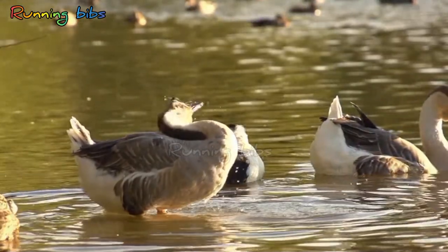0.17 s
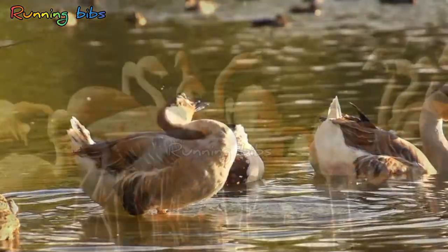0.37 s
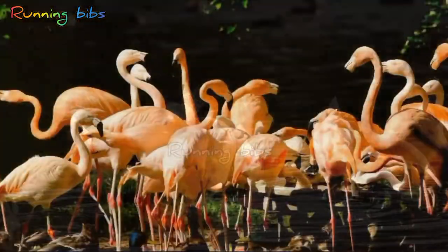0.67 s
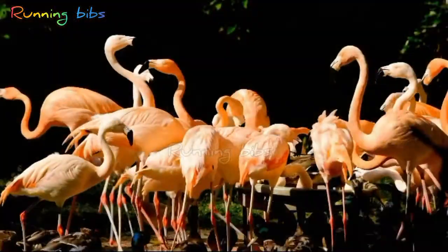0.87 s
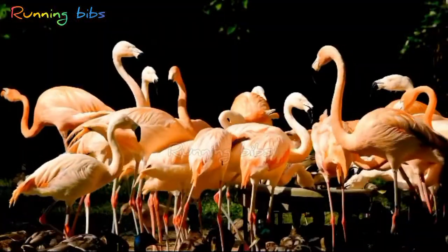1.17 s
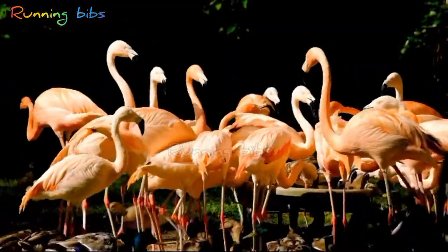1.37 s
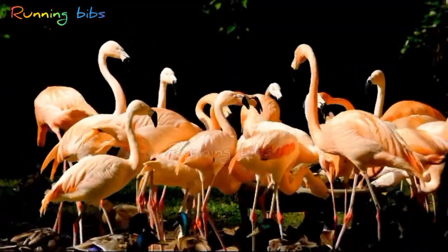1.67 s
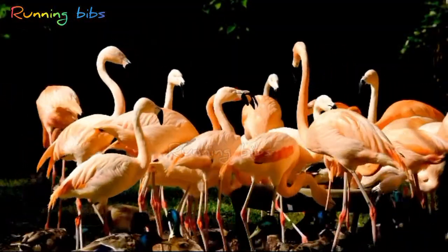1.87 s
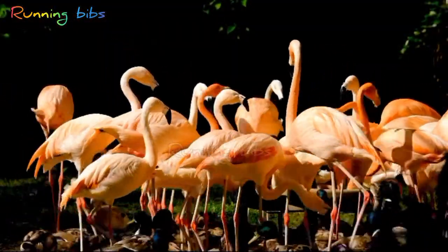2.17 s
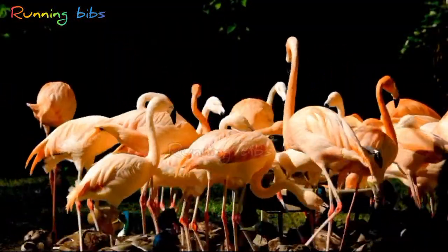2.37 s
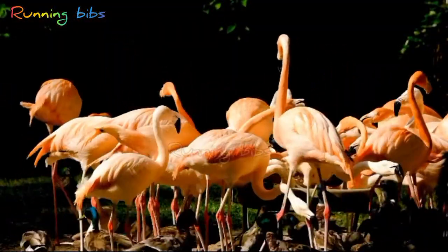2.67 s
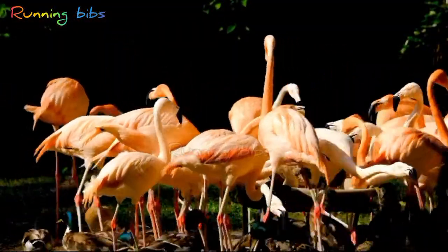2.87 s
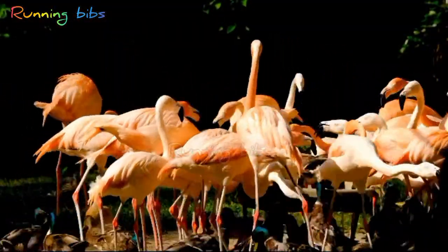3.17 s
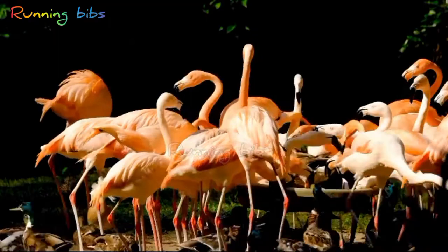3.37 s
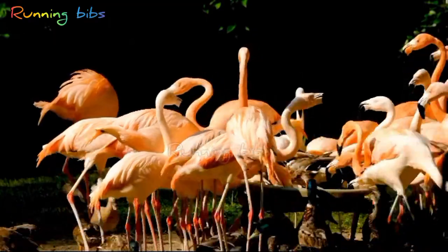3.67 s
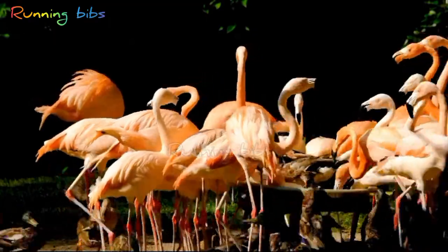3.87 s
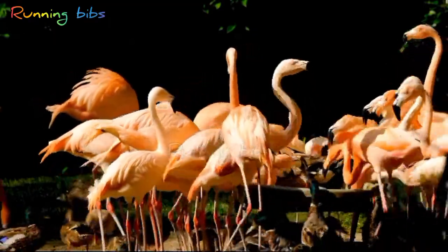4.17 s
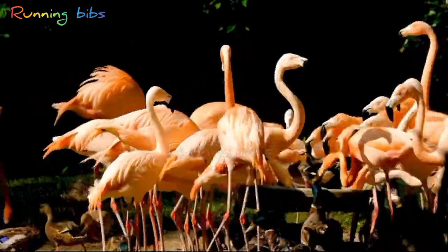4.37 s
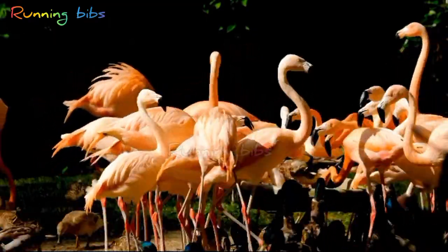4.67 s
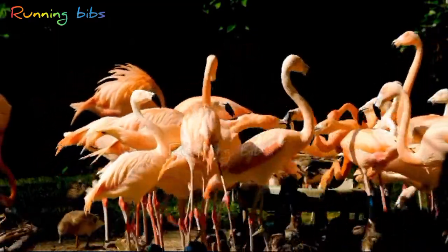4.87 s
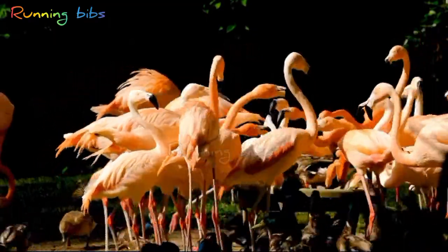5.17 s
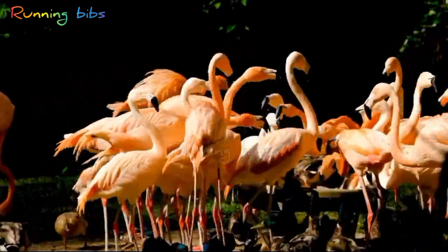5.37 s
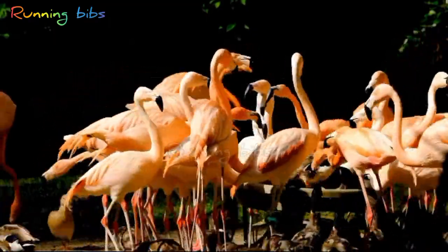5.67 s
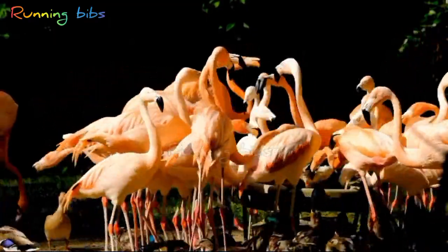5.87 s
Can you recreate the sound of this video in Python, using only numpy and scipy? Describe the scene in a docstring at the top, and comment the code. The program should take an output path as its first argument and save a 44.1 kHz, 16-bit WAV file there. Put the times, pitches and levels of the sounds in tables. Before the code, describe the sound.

For the first half second, geese splash in shallow water: dense small bubbles, spray and a few rounder plops, close and slightly left, fading quickly. At about 0.53 s an open-air bird park comes in, with airy hush, light low wind gusts, mostly before 2.2 s, and a deep pump hum. A dull knock falls at 0.65. Gull-like calls, a high yelp dropping into a lower reedy wail, sound at 1.0 and 2.5, with shorter cries at 2.2, 3.0 and 3.2, and the loudest pair at 4.75. Near sparrows cheep sharply at 1.5, 3.2, 4.4 and 5.9 and chirrup at 2.0, 2.4, 3.7 and 4.1, amid distant chatter and thin high peeps. On the right a hoarse duck quacks irregularly until 2.9, then from 3.5 about every 0.3 s, stronger after 4. A snap comes at 2.2, a sharper double knock at 4.6. Slight outdoor echo; everything continues to the end at 6 s.

```python
"""Pond and bird park

Splashing geese in a shallow pond, made of ringing bubbles and spray noise, fade out as a bird park opens.
A gull's wailing two-note calls are sums of harmonics; sparrows near and far chirp in swept tones.
On the right a duck quacks, pulses ringing its throat; a few knocks are damped bursts of noise.
Under them lie a humming pump of three sines and light wind of coloured noise."""
import sys
import numpy as np
from scipy import signal
from scipy.fft import rfft, irfft
from scipy.io import wavfile
from scipy.ndimage import uniform_filter1d, minimum_filter1d

SR = 44100
rng = np.random.default_rng(int(sys.argv[2]) if len(sys.argv) > 2 else 0)


def materialize(psi):
    """Save the field psi as 16-bit PCM at rate SR to the path in sys.argv[1].

    A 1-D psi becomes a single channel; in a 2-D psi each row is a channel.
    """
    bounded = np.clip(np.atleast_2d(psi).T, -1, 1)
    quanta = np.round(bounded * 32767).astype(np.int16)
    wavfile.write(sys.argv[1], SR, quanta)


N = 264600
TIME = np.arange(N) / SR

# sparrow syllable, up-and-down sweeps of the syrinx: top from the accent t/s, rise/s, fall/s,
# start f/Hz, top f/Hz, end f/Hz, relative level/dB; each call scales times and pitch
CHIRRUP_SWEEPS = [(0, .014, 0.0179, 3397, 4340, 3446, -0.37), (.019, .008, .012, 3539, 3900, 2800, -1),
                  (.043, .016, .022, 2903, 3547, 2858, 2)]


def amp(db):
    """Logarithmic level: decibels to amplitude ratio."""
    return 10 ** (np.asarray(db) / 20)


def unit(x):
    """Normalization by power: scales to rms 1."""
    return x / np.sqrt(np.mean(x ** 2) + 1e-20)


def read(points, hz):
    """Spectral envelope: interpolates levels on a log-frequency axis."""
    f, value = np.transpose(points)
    return np.interp(np.log(hz + 1), np.log(f + 1), value)


def add(mix, s, sound):
    """Superposition: adds a sound into a track from time s."""
    part = mix[max(round(s * SR), 0):][:len(sound)]
    part += sound[:len(part)]


def colour(x, points):
    """Linear filtering: weights the spectrum of x, then sets rms 1."""
    n = x.shape[-1]
    gain = amp(read(points, np.fft.rfftfreq(n, 1 / SR)))
    return unit(irfft(rfft(x) * gain, n))


def wander(count, rate):
    """Band-limited fluctuation: noise rolled off above a rate in Hz, normalized to rms 1."""
    hz = np.fft.rfftfreq(SR if count < SR else N, 1 / SR)
    noise = rng.standard_normal(2 * len(hz) - 2)
    return unit(irfft(rfft(noise) / (1 + (hz / rate) ** 4)))[:count]


def resonate(x, hz, width):
    """Damped resonance: one pole whose bandwidth sets its decay, with peak gain near 1."""
    r = np.exp(-np.pi * width / SR)
    pole = r * np.exp(2j * np.pi * hz / SR)
    return 2 * signal.lfilter([1 - r], [1, -pole], x).real


def low_pass(x, hz):
    """Band limitation: a steep linear-phase filter."""
    taps = signal.firwin(401, hz, window=("kaiser", 8), fs=SR)
    return signal.oaconvolve(x, taps[None], "same", axes=1)


def noise_pair(alike):
    """Partial coherence: two white noises share the fraction alike of their power."""
    shared, own, alike = rng.standard_normal(N), rng.standard_normal((2, N)), np.clip(alike, 0, 1)
    return np.sqrt(alike) * shared + np.sqrt(1 - alike) * own


def place(x, lead_ms, left_db, near_db, near_t60, far_db, far_t60):
    """Localization and reverberation: arrival and level differ by side; walls scatter early, trees late.

    The left leads by lead_ms; near_t60 and far_t60 are 60 dB decay times in seconds."""
    t = TIME[:SR]
    taps = rng.standard_normal((2, 2, SR)) * (rng.random((2, 2, SR)) < .12)  # sparse reflections
    near = unit(taps[0] * amp(-60 * t / near_t60) * (t > .002))
    far = unit(taps[1] * amp(-60 * t / far_t60) * np.minimum(t / .045, 1))
    response = (amp(near_db) * near + amp(far_db) * far) / np.sqrt(SR)
    echoes = signal.fftconvolve(x[None], response, axes=1)[:, :N]
    delay = np.exp(-2j * np.pi * np.fft.rfftfreq(N, 1 / SR) * lead_ms / 1000)
    right = irfft(rfft(x) * delay, N)
    return np.array([x * amp(left_db / 2), right * amp(-left_db / 2)]) + echoes


def open_air(air_db):
    """Diffuse noise: nearly incoherent coloured noise of gently varying level."""
    # spectral density of the open air: f/Hz, relative density/dB
    air_spectrum = [(20, -13), (50, -2.5), (110, 0), (200, -7), (320, -9.5), (600, -12), (1000, -15),
                    (1600, -13.5), (2400, -12.5), (4000, -23), (6000, -42), (8000, -64), (11000, -50)]
    return amp(air_db + 0.8 * wander(N, 6.3)) * colour(noise_pair(alike=0.071), air_spectrum)


def wind(wind_db):
    """Turbulence at the microphones: low noise swells in Gaussian gusts over a breeze."""
    # gusts: centre t/s, relative level/dB, 1/e half length/s
    gust_times = [(0.773, -33.5, 0.13), (0.995, -26.5, 0.16), (1.176, -42, 0.14), (1.368, -28, 0.032),
                  (1.64, -38.5, 0.11), (2.124, -32.5, 0.056), (2.88, -44.5, 0.13), (5.229, -45, 0.022),
                  (5.454, -35.5, 0.094), (5.75, -44.5, 0.56)]
    # spectral density of the wind: f/Hz, relative density/dB
    wind_spectrum = [(15, -2), (35, 5.5), (60, -5), (110, -15), (200, -21), (500, -53)]
    gusts = amp(-51.5)  # breeze between gusts, on the same relative scale
    for s, db, half in gust_times:
        gusts = gusts + amp(db) * np.exp(-((TIME - s) / half) ** 2)
    return amp(wind_db) * gusts * colour(noise_pair(alike=0.13), wind_spectrum)


def pump(hum_db):
    """Tonal hum: three sines share a slight frequency drift, and each wavers in level."""
    # partials of the pump: f/Hz, relative level/dB
    hum_partials = [(71.2, -43.5), (142.2, -52.5), (212.8, -57.5)]
    # rise and final receding of the hum: t/s, relative level/dB
    hum_swell = [(.5, -1.5), (2.3, 2.5), (3.8, -1), (5, -2), (6, -7.5)]
    clock = TIME + np.cumsum(.006 * wander(N, 2.4)) / SR
    hum = np.zeros(N)
    for hz, db in hum_partials:
        hum += amp(db + 3.0 * wander(N, 2.17)) * np.sin(2 * np.pi * (hz * clock + rng.random()))
    swell_db = np.interp(TIME, *np.transpose(hum_swell))
    sides = amp([[-1.5], [1.2]])  # left, right
    return np.sqrt(2) * amp(hum_db + swell_db) * hum * sides


def bubble(hz):
    """Bubble resonance: a damped tone rises in pitch; smaller, higher ones die sooner."""
    t = TIME[:2500]
    return np.sin(2 * np.pi * hz * t * (1 + 4 * t)) * np.exp(-t * hz / 6)


def splashing(drops_per_s, spread_db, wash_db):
    """Random excitation: falling drops ring small bubbles over a wash of spray."""
    # spectral weighting of the water: f/Hz, relative level/dB
    water_spectrum = [(40, -9.5), (190, -8.5), (270, -0.5), (420, -11.5), (600, -10.5), (1120, -7.5),
                      (2600, -8), (4000, -8), (7000, -17), (12000, -26.5), (15500, -33), (17000, -70)]
    # larger bubbles: t/s, level/dB, starting f/Hz
    plop_times = [(.066, -47, 860), (0.087, -49, 495), (0.123, -46, 1065), (.14, -42, 765),
                  (.187, -39, 1060), (.262, -42, 730), (0.308, -64, 430)]
    pond_db, hold_s, fade_s, fade_power = -40.5, 0.14, 0.39, 1.43  # spray holds, then fades to silence
    drops, plops = np.zeros((2, N)), np.zeros(N)
    sizes = np.geomspace(350, 9000, num=30)  # bubble pitches in Hz
    for hz in sizes:
        struck = rng.random(SR) < drops_per_s / len(sizes) / SR
        hits = struck * amp(spread_db * np.minimum(rng.exponential(1, SR), 3))
        ringing = signal.oaconvolve(hits, bubble(hz))[:SR]
        drops[:, :SR] += ringing * amp(2 * rng.standard_normal((2, 1)))
    wash = amp(wash_db) * noise_pair(alike=0.54)[:, :SR]
    spray = colour(unit(drops[:, :SR]) + wash, water_spectrum)
    for s, db, hz in plop_times:
        add(plops, s, amp(db) * bubble(hz))
    swell = amp(pond_db) * np.clip(1 - (TIME - hold_s) / fade_s, 0, 1) ** fade_power
    spray = np.pad(spray, ((0, 0), (0, N - SR)))
    return (spray * swell + plops) * amp([[1], [-1]])  # slightly to the left


def knocks():
    """Impact: a crack of noise and a resonant body die away together."""
    # knocks and snaps: t/s, body level/dB, 60 dB decay/s, body f/Hz,
    # width of each of two resonators/Hz, crack relative to body/dB
    blows = [(0.641, -28, 0.12, 435, 70, -4), (.878, -37.5, 0.056, 650, 250, -24),
             (2.199, -29, 0.022, 654, 250, 3.5), (4.6, -32, 0.12, 1980, 800, 1.5),
             (4.653, -18.5, 0.024, 1580, 600, 7.5)]
    # spectral weighting of the crack: f/Hz, relative level/dB
    crack_spectrum = [(100, -10), (250, 1.5), (1500, 2.5), (3000, -4.5), (5300, 4.5), (7000, -11),
                      (11000, -12)]
    out, t = np.zeros(N), TIME[:8192]
    attack = np.minimum(t / .002, 1)
    for s, db, ring, hz, width, crack_db in blows:
        blow = rng.standard_normal(len(t))
        body = unit(resonate(resonate(blow, hz, width), hz, width))
        crack = amp(crack_db) * colour(blow, crack_spectrum)
        add(out, s, attack * amp(db - 60 * t / ring) * (body + crack))
    return place(out, lead_ms=0.079, left_db=5, near_db=-2.5, near_t60=0.27, far_db=-8, far_t60=0.82)


def duck(pulse_hz, rough, closing):
    """Source and filter: slow pulses, each with a puff of noise, ring the throat hoarsely."""
    # quacks: t/s, relative level/dB, nominal length/s (the drive lasts twice that, weak at the end)
    quacks = [(0.528, -29.5, 0.016), (0.662, -32, 0.092), (1.031, -27, 0.025), (1.116, -32.5, 0.14),
              (1.254, -25.5, 0.048), (1.647, -28.5, 0.02), (1.736, -32.5, 0.065), (1.885, -38, 0.098),
              (1.994, -31.5, 0.012), (2.27, -35.5, 0.1), (2.476, -32, 0.07), (2.55, -27.5, 0.045),
              (2.68, -33, 0.041), (2.84, -27, 0.046), (3.509, -32, 0.048), (3.816, -25.5, 0.031),
              (4.114, -21.5, 0.019), (4.417, -24.5, 0.031), (4.714, -21, 0.026), (4.985, -20, 0.038),
              (5.279, -23, 0.034), (5.581, -22.5, 0.02), (5.913, -24, 0.038)]
    # throat resonances: f/Hz, width of each of two resonators/Hz, relative level/dB
    duck_throat = [(1300, 300, -1), (1600, 340, 0), (2400, 600, -26)]
    out = np.zeros(N)
    for s, db, length in quacks:
        t = TIME[:round(2 * length * SR)]
        turns = np.cumsum(pulse_hz * (1 + 0.0897 * wander(len(t), 83))) / SR
        pulses = np.diff(np.floor(turns), prepend=-1)
        puffs = np.exp(-(turns % 1) / closing) * rng.standard_normal(SR)[:len(t)]
        effort = np.interp(t / length, [0, .2, .8, 1.2, 2], [0.75, 1.0, 0.61, 0.0014, 0.16])
        drive = (unit(pulses) + rough * unit(puffs)) * effort
        voice = sum(amp(g) * resonate(resonate(drive, hz, w), hz, w) for hz, w, g in duck_throat)
        add(out, s, amp(db - 10.5) * unit(voice))
    return place(out, lead_ms=-.35, left_db=-6, near_db=-8, near_t60=.14, far_db=-19, far_t60=.6)


def songbird(calls, syllable, rough, buzz_db, octave_db, rasp_db):
    """Frequency modulation: the syrinx whistles fast sweeps with a raspy edge and a weak octave."""
    rise_db, fall_db, power = -15.5, -17, 1.3  # a sweep is loudest at its pointed top
    out = np.zeros(N)
    waver, buzz, rasp = wander(N, 500), wander(N, 520), wander(N, 2730)
    for s, db, pitch, stretch in calls:
        for top_s, rise, fall, start_hz, top_hz, end_hz, sweep_db in syllable:
            t = np.arange(-rise, fall, 1 / (SR * stretch))
            n, u = len(t), np.interp(t, [-rise, 0, fall], [-1, 0, 1])
            bend = abs(u) ** power  # 0 at the top, 1 at both ends
            hz = pitch * (top_hz + (np.where(t < 0, start_hz, end_hz) - top_hz) * bend)
            at = rng.integers(N - SR) + np.arange(n)  # a random stretch of the fluctuations
            phase = 2 * np.pi * np.cumsum(hz * (1 + rough * waver[at])) / SR
            shape_db = np.where(t < 0, rise_db, fall_db) * bend
            swell = amp(db + sweep_db + shape_db + buzz_db * buzz[at])
            swell = swell * (1 + amp(rasp_db) * rasp[at]) * signal.windows.tukey(n, .15)
            whistle = np.sin(phase) + amp(octave_db) * np.sin(2 * phase)
            add(out, s + (top_s - rise) * stretch, swell * whistle)
    return out


def chatter(level_db, spread_db):
    """Random superposition: the rest of the flock chirps at chance times, far away."""
    when, loud, pitch, length = rng.random((150, 4)).T  # 150 chirps
    levels = level_db + spread_db * loud
    calls = np.transpose([when * N / SR, levels, .9 + 1.4 * pitch ** 2, .5 + length])
    return songbird(calls, CHIRRUP_SWEEPS, rough=0.0429, buzz_db=7.5, octave_db=-10.5, rasp_db=-15)


def sparrows():
    """Distance cue: two near birds are mostly direct sound, those among the trees mostly scattered."""
    # all calls: accent t/s, relative level/dB, pitch factor, length factor
    # first near bird
    cheep_calls = [(1.535, -21, 0.99, 1.06), (3.233, -20.5, 0.96, 1.02), (4.411, -20.5, 0.98, .95),
                   (5.923, -20.5, 0.98, 1)]
    # second near bird
    chirrup_calls = [(1.995, -24, 0.97, 0.88), (2.397, -26, 0.94, 1.07), (3.682, -23.5, 0.99, 1.1),
                     (4.128, -25, 0.98, 0.92)]
    # far sparrows
    far_calls = [(.85, -35.5, 1.12, 1.72), (1.03, -25.5, 1.01, 0.66), (1.34, -52, 1.2, 0.68),
                 (2.29, -33, 1.08, 1.9), (2.93, -29, 0.97, 0.9), (3.08, -37, 1.3, 0.5),
                 (3.8, -34, 1.08, 1.15), (3.92, -35.5, 1.046, 2.7), (4.27, -36, 1.32, 1.5),
                 (4.55, -31.5, 1.09, 0.94), (4.88, -30.5, 1.09, 1.65), (5.06, -28, 1.1, 1.2),
                 (5.16, -35, 1.34, 0.78), (5.42, -26.5, 1.126, 1.17), (5.5, -28.5, 1.08, 1.44),
                 (5.64, -35.5, 0.93, 1.46), (5.76, -33.5, 1.24, 1.36)]
    # thin high calls of small birds
    seep_calls = [(.945, -28, 0.88, 0.77), (1.1, -38.5, 1.04, 2.8), (1.5, -33.5, 1.26, 0.61),
                  (2.02, -31, 0.86, 2), (2.23, -30, 0.94, 1.9), (2.53, -32, 0.79, 2.34),
                  (3.68, -37.5, 0.93, 1.5), (4.38, -30.5, 1.1, 0.81), (4.61, -26, 1.1, 0.75),
                  (4.67, -24.5, 1, 0.95), (5.45, -35.5, 0.9, 2.95), (5.89, -24.5, 0.89, 0.95)]
    # both syllables: top from the accent t/s, rise/s, fall/s, start f/Hz, top f/Hz, end f/Hz,
    # relative level/dB; each call scales times and pitch
    cheep_sweeps = [(-.029, .03, .016, 3670, 5350, 4900, 0), (-.006, .028, .006, 2450, 4700, 4550, 4),
                    (-.001, .003, .015, 4600, 4500, 2700, 10), (.021, .011, .011, 4400, 4600, 3600, -1),
                    (.057, .021, .016, 2620, 3270, 2700, 4)]
    # thin high syllable: the same columns
    seep_sweeps = [(-.005, 0.037, 0.023, 6760, 8150, 7400, -5.5)]
    cheeps = songbird(cheep_calls, cheep_sweeps, rough=.014, buzz_db=2.5, octave_db=-28, rasp_db=-16)
    chirrups = songbird(chirrup_calls, CHIRRUP_SWEEPS, rough=.015, buzz_db=2, octave_db=-22, rasp_db=-15)
    flock = songbird(far_calls, CHIRRUP_SWEEPS, rough=0.0749, buzz_db=4.0, octave_db=-17.5, rasp_db=-9.5)
    seeps = songbird(seep_calls, seep_sweeps, rough=.08, buzz_db=3, octave_db=-50, rasp_db=-9)
    first = place(cheeps, lead_ms=.105, left_db=2.5, near_db=-5, near_t60=.18, far_db=-13, far_t60=.7)
    second = place(chirrups, lead_ms=.115, left_db=2, near_db=-6, near_t60=.22, far_db=-11, far_t60=.7)
    far = amp(-8.0) * flock + amp(-2.5) * seeps + chatter(level_db=-63.5, spread_db=16)
    distant = place(far, lead_ms=.09, left_db=2, near_db=4, near_t60=.2, far_db=1, far_t60=.6)
    return first + second + distant


def gull(notes, settle_s, sag_power, attack_s, release_s, swell_db, fade_db, slack, jitter):
    """Harmonic synthesis: a strong fundamental with reedy partials shaped by the throat.

    Each note slides onto its pitch, holds it and sags; the effort swells to a crest and fades."""
    # colour of the upper partials: f/Hz, relative level/dB
    gull_throat = [(2200, 0), (2900, 1.5), (3800, -4), (4700, -3.5), (5200, 10), (5700, 3), (6600, -0.5),
                   (7600, -10), (8600, -43), (9500, -0.5), (11000, -26)]
    octave_slack = 0.27  # the octave fades faster than the fundamental, slower than the reedy partials
    out = np.zeros(N)
    for s, length, held_hz, scoop, hold, sag, crest, level_db, octave_db, middle_db, top_db in notes:
        t = TIME[:round(length * SR)]
        n, u = len(t), t / length
        slide = 1 + scoop * np.exp(-t / settle_s)
        droop = 1 - sag * np.interp(u, [hold, 1], [0, 1]) ** sag_power
        hz = held_hz * slide * droop
        effort_db = swell_db * np.interp(u, [0, crest], [1, 0]) ** 2
        effort_db = effort_db + fade_db * np.interp(u, [crest, 1], [0, 1]) ** 2
        gate = np.minimum(t / attack_s, 1) * np.minimum((length - t) / release_s, 1)
        phase = 2 * np.pi * np.cumsum(hz * (1 + jitter * wander(n, 140))) / SR
        reed = (gate * amp(effort_db)) ** slack  # a softer voice loses its upper partials first
        voice = np.cos(phase) + reed ** octave_slack * amp(octave_db) * np.cos(2 * phase)
        for k in range(3, 14):
            high = np.clip((k * hz - 3900) / 700, 0, 1)  # crossover from middle to top partials
            reed_db = (1 - high) * middle_db + high * top_db + read(gull_throat, k * hz)
            level = reed * amp(reed_db + 2.66 * wander(n, 40))
            voice += level * np.cos(k * phase + np.pi * k ** 2 / 7)  # the throat spreads each pulse in time
        add(out, s, np.sqrt(2) * amp(level_db + effort_db) * gate * voice)
    return out


def gulls():
    """Pitch glide and echo: yelps scoop up, wails drop and turn reedy as they swell; one wall answers."""
    # high yelps: t/s, length/s, held f/Hz, starting pitch offset (share), hold before the sag (share
    # of length), sag (share), crest (share of length), level/dB, then relative to the fundamental:
    # octave level/dB, middle partials level/dB, top partials level/dB
    yelp_notes = [(.969, 0.14, 930.6, -0.1, 0.29, 0.17, 0.5, -20, -16, -16.5, -18.5),
                  (2.229, 0.07, 821, -0.12, 0.64, 0.2, 0.68, -29, -20, -22, -22),
                  (2.538, 0.088, 934, -0.11, 0.36, 0.21, 0.55, -22, -18.5, -15, -21),
                  (3.18, 0.14, 978, 0.0016, 0.066, 0.18, 0.26, -22.5, -4.5, -12.5, -9),
                  (4.738, 0.1, 958, -0.075, 0.33, 0.17, .33, -14, -17, -6, -9)]
    # lower wails, most straight after a yelp: the same columns
    wail_notes = [(1.098, 0.21, 728.8, 0.055, 0.425, 0.0757, 0.77, -18, -19, -26.5, -29.5),
                  (2.615, .21, 732.4, 0.06, 0.4, 0.079, 0.76, -15.5, -24, -23, -33.5),
                  (2.964, 0.09, 688, 0.0072, 0.45, 0.086, 0.53, -24.5, -23, -22.5, -31),
                  (4.84, 0.22, 741.6, 0.052, 0.64, 0.09, 0.68, -14, -25, -22.5, -39.5)]
    # faint gull cries: the same columns
    faint_notes = [(2.28, 0.26, 745, .03, .05, 0.122, .4, -51, -25, -30, -25),
                   (4.96, .265, 1037, 0, 0.0997, .185, 0.51, -37.5, -16, -12.5, -25)]
    yelps = gull(yelp_notes, settle_s=0.00765, sag_power=1.65, attack_s=0.0095, release_s=0.0045,
                 swell_db=-4.5, fade_db=-17.5, slack=2.54, jitter=0.006)
    wails = gull(wail_notes, settle_s=.014, sag_power=1.59, attack_s=.03, release_s=0.029,
                 swell_db=-7, fade_db=-9, slack=1.9, jitter=0.0034)
    cries = gull(faint_notes, settle_s=.01, sag_power=1.6, attack_s=0.04, release_s=0.0086,
                 swell_db=-0.5, fade_db=-2.5, slack=1, jitter=0.013)
    calls = yelps + wails + cries
    wall_s, wall_db = .043, -23  # one wall returns the yelps and wails
    add(calls, wall_s, amp(wall_db) * (yelps + wails))
    return place(calls, lead_ms=0.051, left_db=5.0, near_db=-33.5, near_t60=0.45, far_db=-21, far_t60=0.61)


def scene():
    """Superposition of sources: the pond fades away, then the band-limited park comes in quickly."""
    park_opens_s, opening_s, park_edge_hz = 0.5257, 0.022, 11050
    background = open_air(air_db=-42.5) + wind(wind_db=-2.5) + pump(hum_db=-1.0)
    park = background + knocks() + duck(pulse_hz=122.6, rough=0.91, closing=1.0) + sparrows() + gulls()
    opening = np.clip((TIME - park_opens_s) / opening_s, 0, 1)
    pond = splashing(drops_per_s=2400, spread_db=4.5, wash_db=1)
    return low_pass(park * opening, park_edge_hz) + pond


def record(dry):
    """Peak limiting: a smoothed gain eases the highest peaks down; then the recorder's band limit."""
    ceiling, edge_hz = .9, 15800
    allowed = ceiling / np.maximum(abs(dry).max(axis=0), ceiling)
    gain = uniform_filter1d(minimum_filter1d(allowed, size=441), size=441)  # 10 ms windows
    return low_pass(dry * gain, edge_hz)


dry = scene()
out = record(dry)
materialize(out)
```